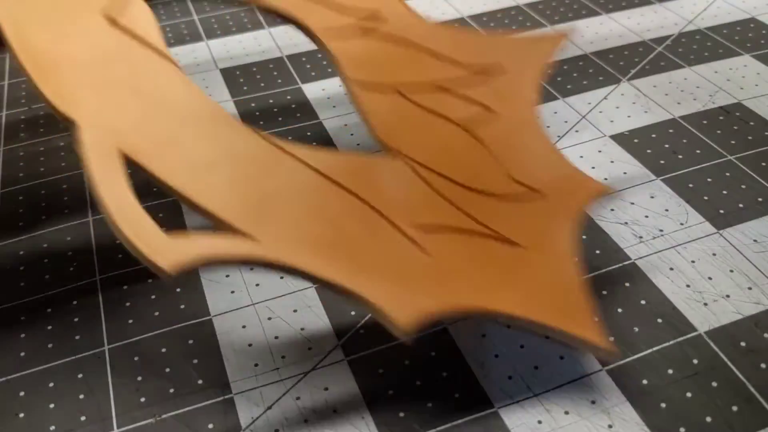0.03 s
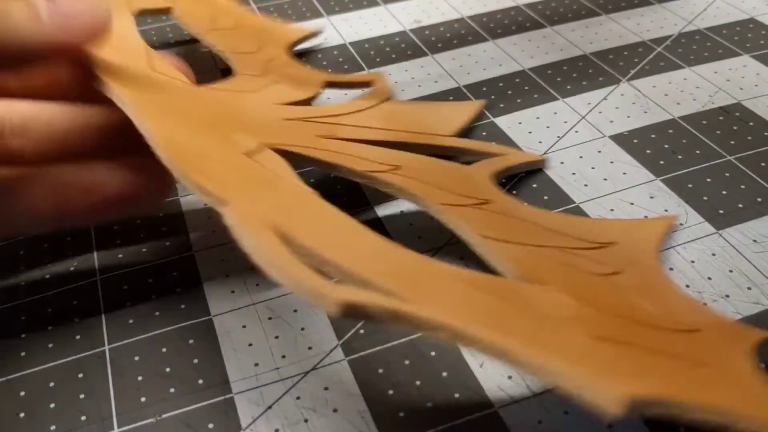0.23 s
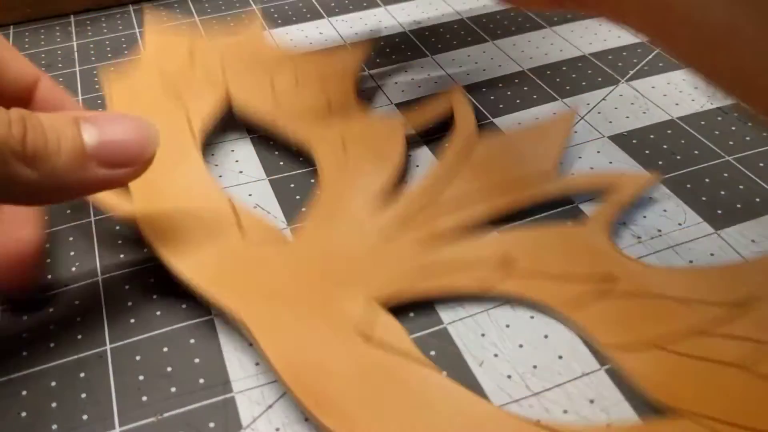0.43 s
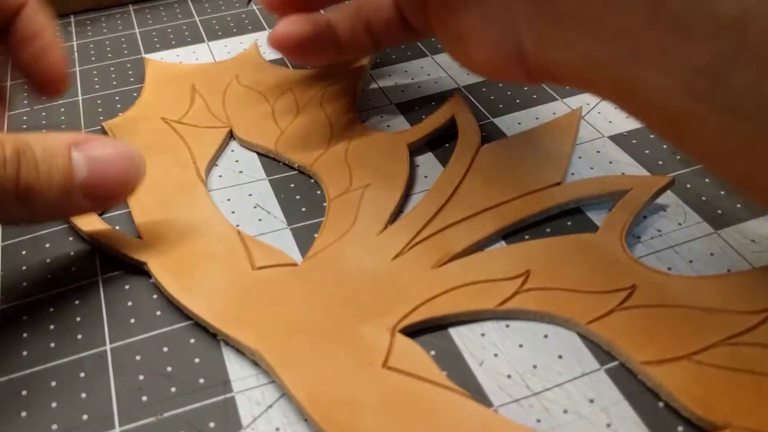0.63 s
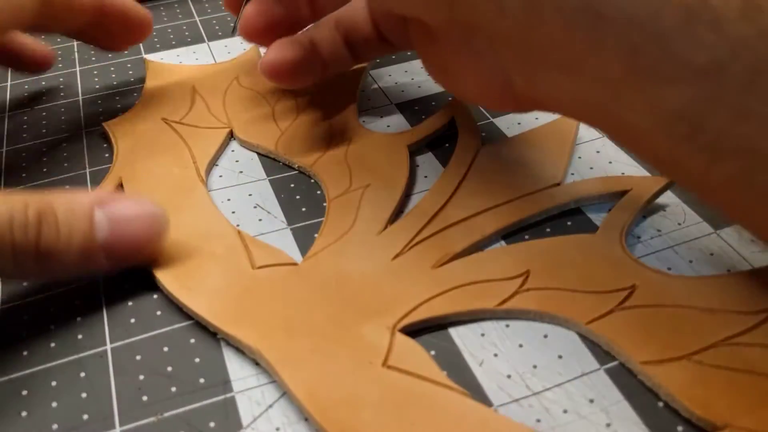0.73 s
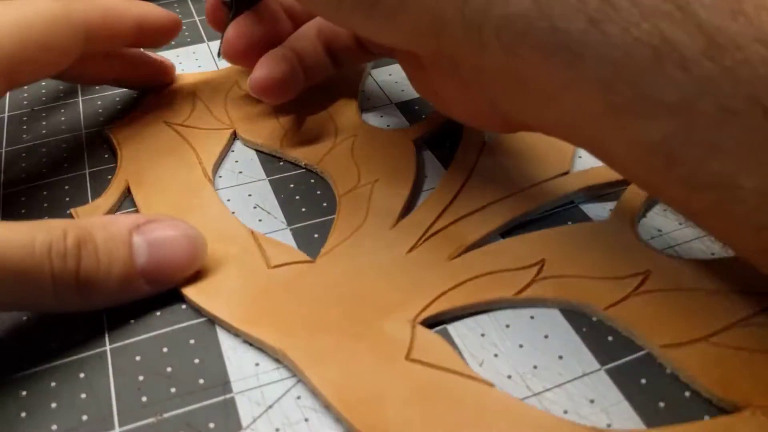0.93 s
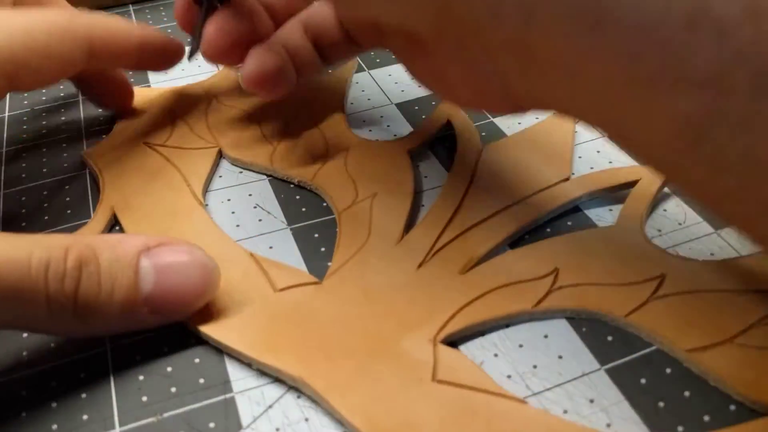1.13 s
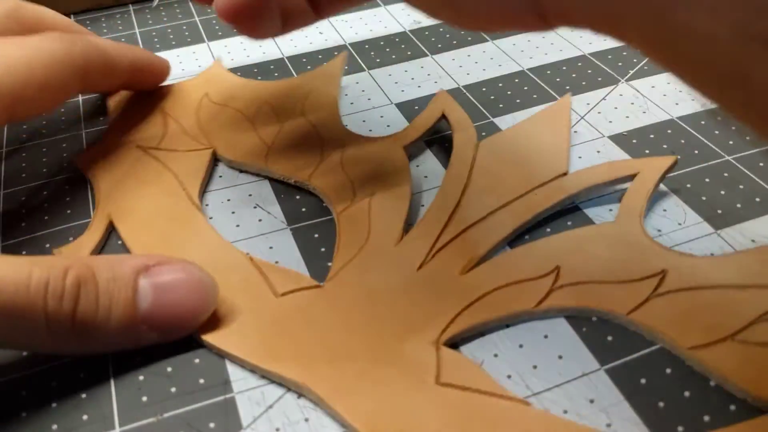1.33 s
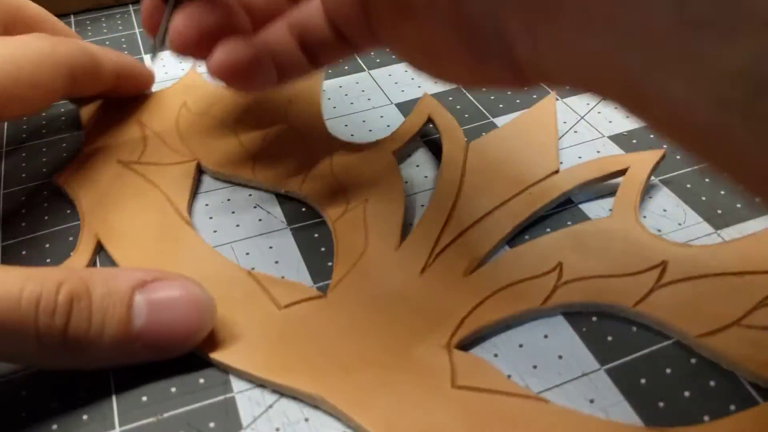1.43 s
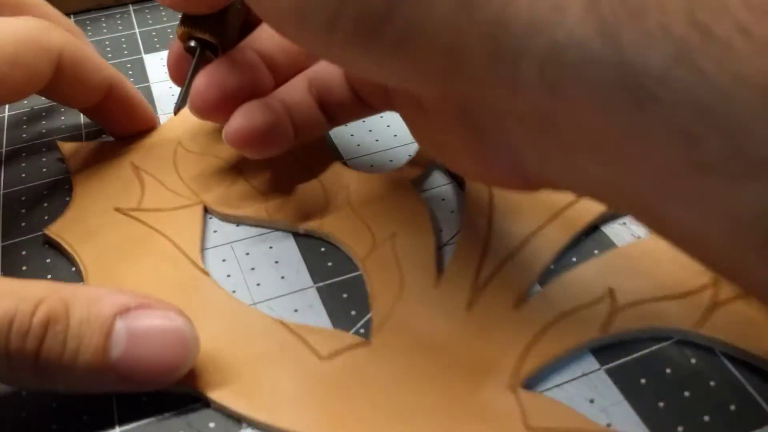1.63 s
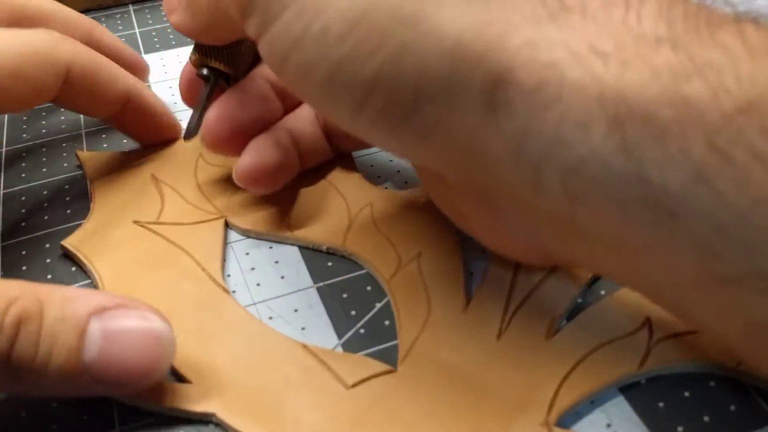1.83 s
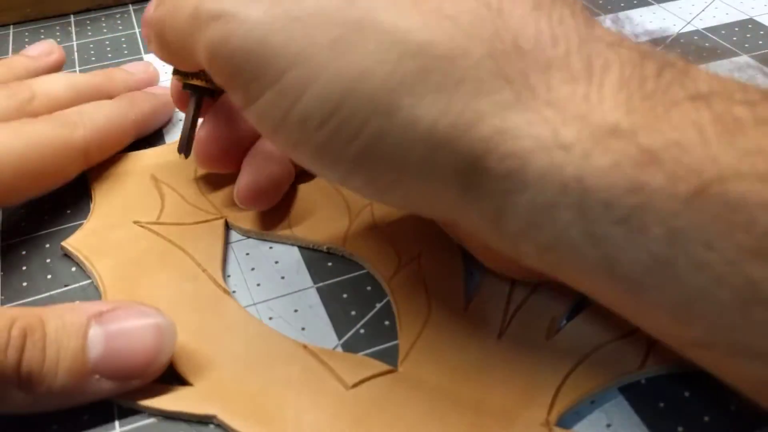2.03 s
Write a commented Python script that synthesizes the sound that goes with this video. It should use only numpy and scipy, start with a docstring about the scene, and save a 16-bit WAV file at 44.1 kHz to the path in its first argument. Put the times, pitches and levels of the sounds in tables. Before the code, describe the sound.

A stiff leather cut-out slides over a cutting mat and drops flat with a slap. A small hand tool is scraped up, then hand and tool brush the leather in soft swishes, close by in a quiet room.

```python
"""A quiet room, close to a cutting mat on a table. A stiff leather cut-out slides over the mat,
hissing and chattering as its edges catch, then drops flat with a slap and a thump of squeezed air.
A small hand tool is scraped up off the mat; hand and tool then brush the leather in smooth swishes.
A low hum wavers underneath. Both channels carry the same sound."""
import sys
import numpy as np
from scipy import signal
from scipy.fft import rfft, irfft
from scipy.io import wavfile
from scipy.ndimage import uniform_filter1d

SR = 44100
rng = np.random.default_rng(int(sys.argv[2]) if len(sys.argv) > 2 else 0)


def persist_wave(psi):
    """Save psi, clipped to +-1, as 16-bit WAV."""
    counts = np.round(np.clip(psi, -1, 1) * 32767).astype(np.int16)
    wavfile.write(sys.argv[1], SR, np.atleast_2d(counts).T)


N = 92610
T = np.arange(N) / SR

# Spectra of gritty hiss, airy hiss and table thud. Each row: frequency in Hz, level in dB.
GRIT_SPECTRUM = [(150, 9.5), (330, 9), (550, -17), (1200, 6), (1700, -3), (2200, 1), (3000, 2), (7700, 3),
                 (9500, -3)]
AIR_SPECTRUM = [(900, -38), (2200, -3.5), (3300, -4.5), (4600, -1), (15500, 0)]
THUD_SPECTRUM = [(40, -26.5), (70, 0.5), (115, 5), (270, -7), (400, -12.5), (900, -38.5)]
THUD_DECAY_S = 0.018
CATCH_LOW_HZ, CATCH_HIGH_HZ = 924, 1466  # soft catches drive mainly the lowest modes


def sheet(x, stretch=1, low_hz=655):
    """Ring of the leather: bending stretches its pitch; little radiates below the first mode."""
    # Each row: frequency in Hz, level in dB, T60 in seconds.
    modes = [(830, -12, 0.037), (1024, -1, 0.029), (1173, -7.5, 0.023), (1680, -3.5, 0.023),
             (2600, -12.5, 0.015)]
    ringing = ring(x, [(hz * stretch, db, t60_s) for hz, db, t60_s in modes])
    return cut(cut(ringing, low_hz, "high"), low_hz, "high")


def sliding_leather(attack_s=0.007, release_s=0.01):
    """The rough underside hisses on the mat; catching edges make the sheet chatter."""
    # Each row: start and end in seconds, then grit, air and chatter levels in dB.
    pushes = [(.224, 0.257, -62, -47, -61), (0.262, 0.361, -56, -50, -58.5),
              (0.373, 0.433, -48.5, -48, -50), (0.444, 0.504, -49, -62, -48.5),
              (0.491, 0.52, -42.5, -61, -43), (0.503, 0.547, -44, -42.5, -45.5),
              (0.621, 0.634, -52.5, -66, -50.5)]
    power = 0
    for start, end, *levels_db in pushes:
        envelope = np.clip((T - start) / attack_s, 0, 1) * np.exp(-np.maximum(T - end, 0) / release_s)
        power += (from_db(levels_db)[:, None] * envelope) ** 2
    grit_gain, air_gain, chatter_gain = np.sqrt(power)
    grain = patchy(friction(slips_per_s=7000, spread_db=2.5, smooth=0.9))
    catches = friction(slips_per_s=730, spread_db=1.5, smooth=0.29)
    air = colour(patchy(rng.standard_normal(N)), AIR_SPECTRUM)
    chatter = rms_one(sheet(cut(catches, [CATCH_LOW_HZ, CATCH_HIGH_HZ], "band")))
    return grit_gain * colour(grain, GRIT_SPECTRUM) + air_gain * air + chatter_gain * chatter


def touches(top_hz=2200):
    """Each soft touch rings the sheet, slaps the mat and thuds into the table."""
    # Each row: time in seconds, ring, slap and thud levels in dB, slap decay in seconds.
    contacts = [(0.2275, -28, -73, -42.5, .003), (0.4528, -41, -60, -44.5, .002),
                (0.5553, -23.5, -24, -35.5, 0.0025), (0.5573, -49, -30.5, -54, 0.0024),
                (0.581, -28.5, -38, -39, 0.003)]
    # Each row: frequency in Hz, level in dB.
    slap_spectrum = [(150, -12), (400, -4), (800, 4), (1600, 13), (2300, 2), (3200, -1), (4500, -5.5),
                     (15000, -23)]
    times_s, ring_db, slap_db, thud_db, decay_s = np.transpose(contacts)
    rings = sheet(cut(clicks(times_s, ring_db), top_hz, "low"))
    slaps = colour(bursts(times_s, slap_db, decay_s), slap_spectrum)
    thuds = colour(bursts(times_s, thud_db, THUD_DECAY_S), THUD_SPECTRUM)
    return rings + slaps + thuds


def flop(at_s=0.5562, start_hz=956, end_hz=93, fall_s=0.00568, decay_s=0.013, level_db=-30.5):
    """Air squeezed from under the falling sheet: a thump that drops in pitch."""
    age_s = np.maximum(T - at_s, 0)
    cycles = end_hz * age_s + (start_hz - end_hz) * fall_s * (1 - np.exp(-age_s / fall_s))
    return from_db(level_db) * np.exp(-age_s / decay_s) * np.sin(2 * np.pi * cycles)


def hollow():
    """The arched sheet bumps the mat and the hollow under it rings."""
    # Each row: time in seconds, level in dB.
    bumps = [(0.4531, -40), (0.5551, -30.5)]
    # Each row: frequency in Hz, level in dB, T60 in seconds.
    modes = [(384, -3, 0.028), (560, -4, 0.023), (838, 0.5, 0.027)]
    return ring(clicks(*np.transpose(bumps)), modes)


def skid(start_s=0.579, end_s=0.6125, level_db=-39):
    """Lying flat, the sheet skids to rest."""
    # Each row: frequency in Hz, level in dB.
    spectrum = [(800, -15), (1400, 2), (2200, -14), (3400, -10.5), (5000, -19.5), (15000, -28.5)]
    pressure = np.sqrt(swell(start_s, (start_s + end_s) / 2, end_s))
    return from_db(level_db) * colour(pressure * rng.standard_normal(N), spectrum)


def snags(pitch_spread=0.02):
    """An edge snags and lets go softly; the sheet is bent a little differently each time."""
    # Each row: time in seconds, level in dB.
    releases = [(0.264, -30.5), (0.282, -38), (0.298, -38), (0.312, -42), (0.389, -35.5), (0.494, -33),
                (0.51, -31.5), (1.255, -47), (1.307, -46.5)]
    out = 0
    for release in releases:
        stretch = np.exp(pitch_spread * rng.standard_normal())
        pulse = cut(clicks(*np.transpose([release])), [CATCH_LOW_HZ, CATCH_HIGH_HZ], "band")
        out += sheet(pulse, stretch)
    return out


def tool(low_hz=900):
    """The tool drags grittily over the mat and rings from a few hard knocks."""
    # Each row: time in seconds, level in dB.
    drag_curve = [(.724, -58), (.736, -47), (.739, -32), (.749, -32.5), (.754, -43), (.761, -36.5),
                  (.768, -30.5), (.776, -31.5), (.785, -48), (.791, -41), (.797, -41), (.802, -62)]
    knocks = [(0.7386, -17), (0.75, -23), (0.7968, -23.5)]
    # Each row: frequency in Hz, level in dB.
    drag_spectrum = [(600, -21.5), (950, -9), (1380, 4.5), (1850, 1), (2450, 2.5), (3000, -6.5), (4000, -2),
                     (5000, 1), (6500, -6), (8500, -10), (10000, -9.5), (12000, -15)]
    # Each row: frequency in Hz, level in dB, T60 in seconds.
    modes = [(1385, -8.5, 0.028), (1650, -5, 0.0089), (2270, -3.5, 0.0042), (2590, -42, 0.36),
             (3880, -15, 0.0084)]
    times_s, drag_db = np.transpose(drag_curve)
    force = from_db(np.interp(T, times_s, drag_db)) * (T >= times_s[0]) * (T <= times_s[-1])
    grit = patchy(friction(slips_per_s=6000, spread_db=3, smooth=0.7))
    ringing = ring(clicks(*np.transpose(knocks)), modes)
    return colour(force * grit, drag_spectrum) + cut(ringing, low_hz, "high")


def swishes():
    """Hand and tool brush the leather: fine friction, an airy hiss above a soft rub."""
    # Each row: start, peak and end in seconds, then hiss and rub levels in dB.
    strokes = [(0.09, 0.15, 0.2, -63.5, -85), (0.723, 0.723, 0.75, -41, -62),
               (0.773, 0.804, 0.94, -60.5, -81), (0.924, 0.975, 1, -53, -58),
               (1.002, 1.11, 1.243, -46, -55.5), (1.2, 1.227, 1.45, -59.5, -70.5),
               (1.34, 1.449, 1.494, -51, -60), (1.442, 1.582, 1.78, -51.5, -61),
               (1.642, 1.649, 1.81, -49, -57.5), (1.677, 1.8, 1.868, -52, -59.5)]
    # Each row: frequency in Hz, level in dB.
    rub_spectrum = [(300, -4.5), (650, -10), (860, -5.5), (1010, 5), (1200, -0.5), (1520, 2), (2000, -5),
                    (3300, -25.5)]
    power = sum((from_db(levels_db)[:, None] * swell(start, peak, end)) ** 2
                for start, peak, end, *levels_db in strokes)
    hiss_gain, rub_gain = np.sqrt(power)
    hiss = colour(patchy(friction(slips_per_s=6000, spread_db=8.5, smooth=1.8)), AIR_SPECTRUM)
    rub = colour(friction(slips_per_s=2500, spread_db=3.5, smooth=0.62), rub_spectrum)
    return hiss_gain * hiss + rub_gain * rub


def scuffs(log_bandwidth=0.39):
    """Where the contact grips harder, coarse slips briefly excite one resonance."""
    # Each row: middle and length in seconds, level in dB, resonance in Hz.
    grips = [(0.428, 0.03, -47.5, 4620), (1.213, .045, -61.5, 1420), (1.581, .025, -55.5, 1370),
             (1.798, 0.058, -58, 1180)]
    out = 0
    for middle, length, db, hz in grips:
        slips = friction(slips_per_s=2000, spread_db=0.5, smooth=0.5)
        resonance = rms_one(cut(slips, hz * np.exp([-log_bandwidth / 2, log_bandwidth / 2]), "band"))
        out += from_db(db) * swell(middle - length / 2, middle, middle + length / 2) * resonance
    return out


def hand(rustle_hz=(202, 408)):
    """The hand shifts with a dull rustle, bumps the mat and flicks a cut edge."""
    # Each row: start and end in seconds, level in dB.
    shifts = [(1.299, 1.336, -57), (1.804, 2.142, -65), (1.988, 2.011, -50)]
    # Each row: time in seconds, level in dB.
    bumps = [(0.721, -48), (0.74, -44), (1.358, -46), (1.993, -47.5)]
    flicks = [(0.4711, -36), (0.614, -51), (1.275, -49.5)]
    weight = sum(from_db(db) * swell(start, (start + end) / 2, end) for start, end, db in shifts)
    rustle = weight * rms_one(cut(rng.standard_normal(N), rustle_hz, "band"))
    thuds = colour(bursts(*np.transpose(bumps), THUD_DECAY_S), THUD_SPECTRUM)
    edge = colour(bursts(*np.transpose(flicks), decay_s=0.0044), GRIT_SPECTRUM)
    return rustle + thuds + edge


def ticks(low_hz=8500):
    """Single fibres snap crisply as the leather flexes."""
    # Each row: time in seconds, level in dB.
    snaps = [(0.653, -46), (1.419, -39), (1.8825, -41), (1.9848, -39.5)]
    return cut(bursts(*np.transpose(snaps), decay_s=0.00036), low_hz, "high")


def room(x, t60_s=0.21, tail_db=-19, top_hz=4560):
    """Reflections from the table and nearby things, then a faint, dull tail."""
    # Each row: delay in seconds, level in dB.
    echoes = [(.0027, -21), (.0049, -22)]
    tail = rng.standard_normal(N) * from_db(-60 * T / t60_s) * (T > 0.004)
    tail = signal.sosfilt(signal.butter(1, top_hz, fs=SR, output="sos"), tail)
    return convolve(x, clicks(*np.transpose(echoes)) + from_db(tail_db) * tail / np.linalg.norm(tail))


def hum(hz=61, wander_hz=1.41, level_db=-55, throb_s=0.218, crest_s=0.091, depth=0.53):
    """A low tone that throbs in level and wanders in pitch."""
    throb = 1 + depth * np.cos(2 * np.pi * (T - crest_s) / throb_s)
    phase = 2 * np.pi * np.cumsum(hz + wander_hz * drift(rate_hz=4.64)) / SR
    return from_db(level_db) * throb * np.sqrt(2) * np.sin(phase)


def still_air(level_db=-59.5):
    """Steady noise floor of the room."""
    # Each row: frequency in Hz, level in dB.
    spectrum = [(25, -9), (50, 5.5), (190, 3), (300, -4.5), (600, -11.5), (1300, -11.5), (6000, -21),
                (15500, -16.5)]
    return from_db(level_db) * colour(rng.standard_normal(N), spectrum)


def friction(slips_per_s, spread_db, smooth):
    """Tiny slips of uneven size over a share of smooth hiss; unit power."""
    sizes = from_db(spread_db * np.minimum(rng.exponential(1, N), np.pi)) * rng.choice([-1, 1], N)
    slips = rms_one(sizes * (rng.random(N) < slips_per_s / SR))
    return rms_one(slips + smooth * rng.standard_normal(N))


def patchy(x, spread_db=3, size=512):
    """Narrow resonances come and go as the contact moves over the surface; unit power."""
    spectra = signal.stft(x, nperseg=size)[2]
    field = uniform_filter1d(rng.standard_normal(spectra.shape), size=4, axis=0)
    field = rms_one(uniform_filter1d(field, size=10, axis=1))
    return rms_one(signal.istft(spectra * from_db(spread_db * field), nperseg=size)[1][:N])


def bursts(times_s, levels_db, decay_s):
    """Noise that starts at once and dies away, once per event."""
    envelope = sum(from_db(db) * (T >= start) * np.exp(-np.abs(T - start) / decay)
                   for start, db, decay in np.broadcast(times_s, levels_db, decay_s))
    return envelope * rng.standard_normal(N)


def clicks(times_s, levels_db):
    """One impulse per event."""
    return np.bincount((times_s * SR).astype(int), from_db(levels_db), N)[:N]


def swell(start_s, peak_s, end_s):
    """Rounded rise and fall of height 1."""
    return np.sin(np.interp(T, [start_s, peak_s, end_s], [0, np.pi / 2, 0]))


def drift(rate_hz):
    """Slow random wander; unit power."""
    pole = np.exp(-2 * np.pi * rate_hz / SR)
    return rms_one(signal.lfilter([1], [1, -2 * pole, pole * pole], rng.standard_normal(N + SR // 2))[-N:])


def ring(x, modes):
    """Drive a set of damped sines."""
    t = T[:SR // 2]
    response = sum(from_db(db - 60 * t / t60_s) * np.sin(2 * np.pi * hz * t) for hz, db, t60_s in modes)
    return convolve(x, response)


def colour(x, points, size=4096):
    """Minimum-phase filter through (Hz, dB) points; keeps the power of white noise."""
    hz, db = np.transpose(points)
    bins_hz = np.arange(size // 2 + 1) * SR / size
    gain = from_db(np.interp(np.log(bins_hz + 1), np.log(hz), db))
    cepstrum = irfft(np.log(gain))
    cepstrum[1:size // 2] *= 2
    cepstrum[size // 2 + 1:] = 0
    response = irfft(np.exp(rfft(cepstrum)))
    return convolve(x, response / np.linalg.norm(response))


def cut(x, hz, kind):
    """Second-order low-, high- or band-pass."""
    return signal.sosfilt(signal.butter(2, hz, kind, fs=SR, output="sos"), x)


def convolve(x, response):
    """Causal filtering, cut to N samples."""
    return signal.fftconvolve(x, response)[:N]


def from_db(db):
    """Decibels to gain."""
    return 10 ** (np.asarray(db) / 20)


def rms_one(x):
    """Scale to unit power."""
    return x / np.sqrt(np.mean(x ** 2) + 1e-20)


def scene():
    """Handling, room and background, centred."""
    near = sliding_leather() + touches() + flop() + hollow() + skid()
    near += hand() + tool() + swishes() + snags() + scuffs() + ticks()
    mono = near + room(near) + hum() + still_air()
    return np.array([mono, mono])


def record(dry):
    """Steep low-pass at 15950 Hz."""
    taps = signal.firwin(301, 15950, window=("kaiser", 7), fs=SR)
    return signal.fftconvolve(dry, taps[None], "same", axes=1)


dry = scene()
out = record(dry)
persist_wave(out)
```